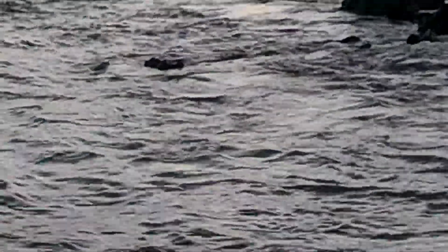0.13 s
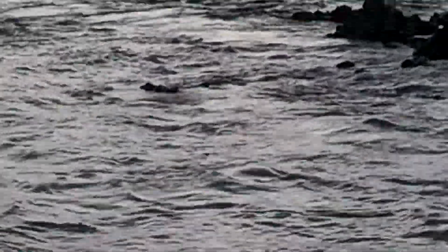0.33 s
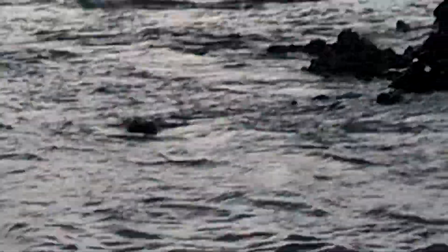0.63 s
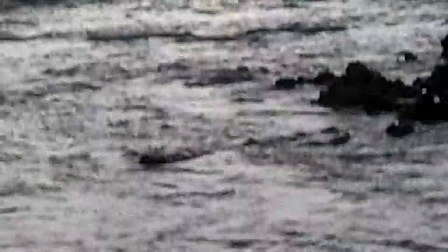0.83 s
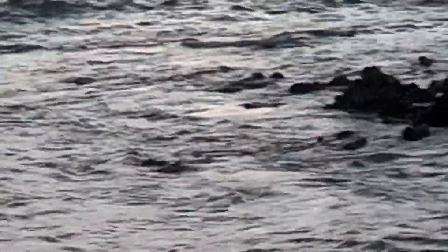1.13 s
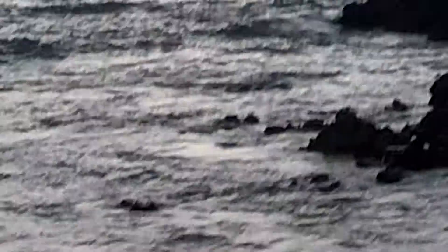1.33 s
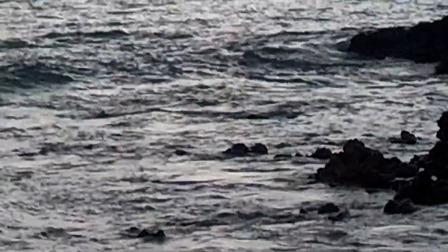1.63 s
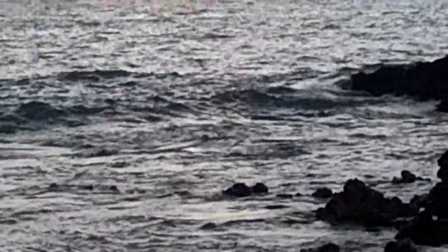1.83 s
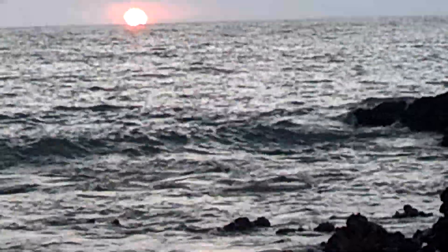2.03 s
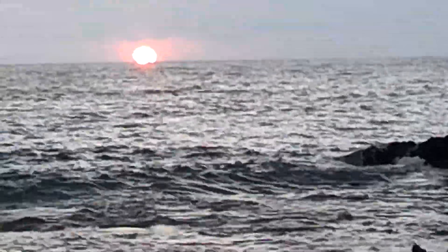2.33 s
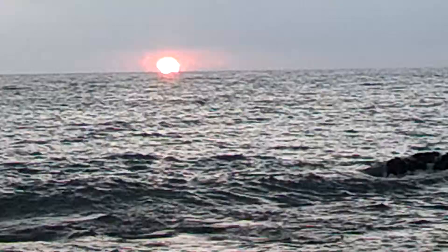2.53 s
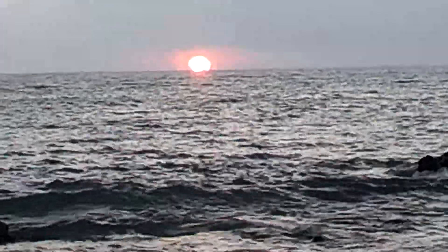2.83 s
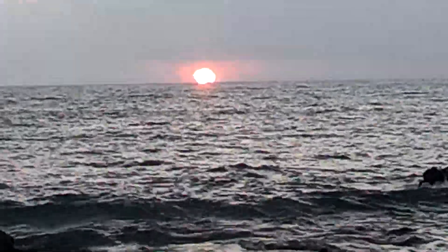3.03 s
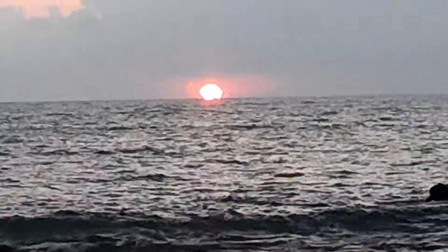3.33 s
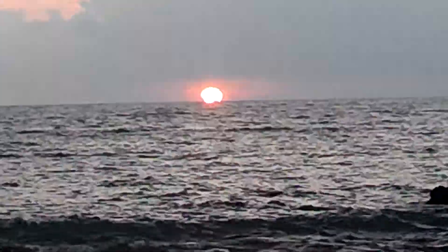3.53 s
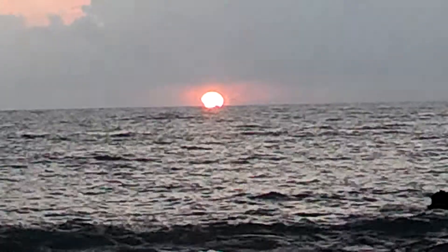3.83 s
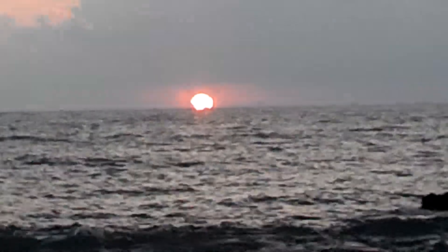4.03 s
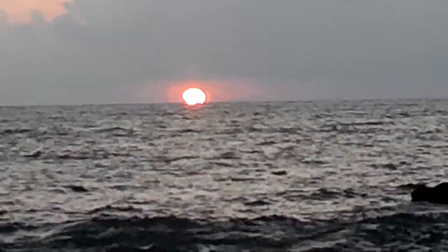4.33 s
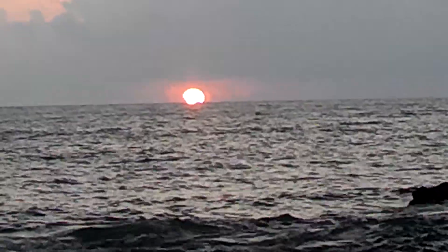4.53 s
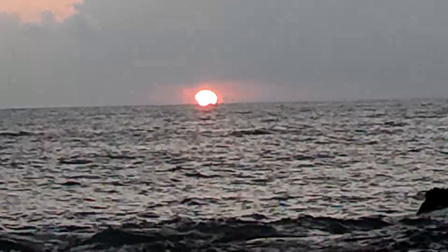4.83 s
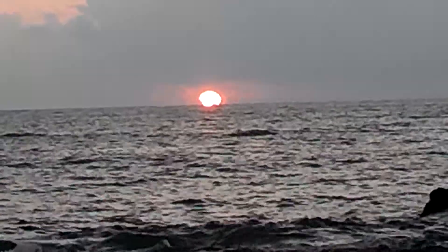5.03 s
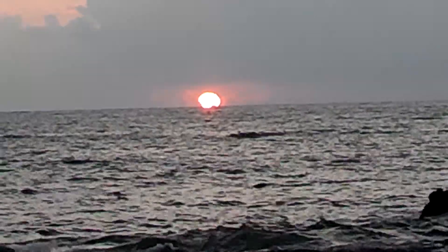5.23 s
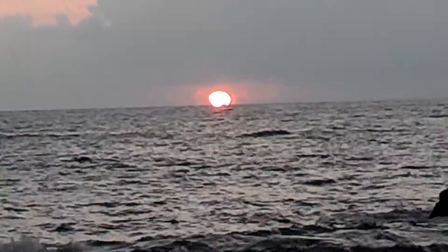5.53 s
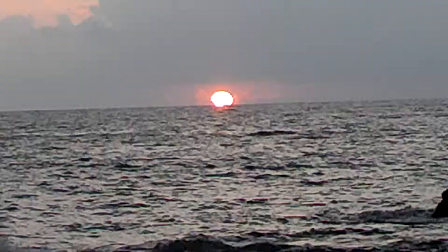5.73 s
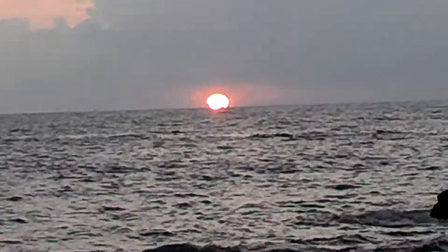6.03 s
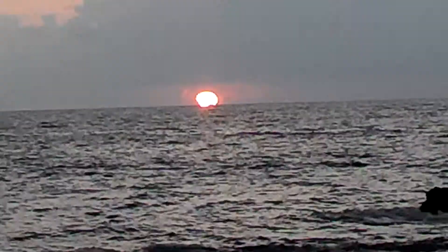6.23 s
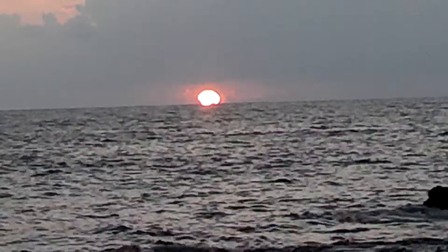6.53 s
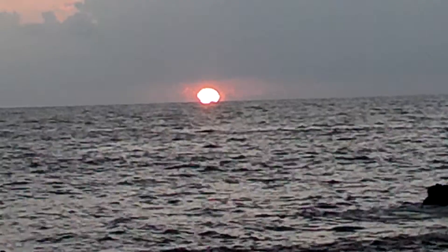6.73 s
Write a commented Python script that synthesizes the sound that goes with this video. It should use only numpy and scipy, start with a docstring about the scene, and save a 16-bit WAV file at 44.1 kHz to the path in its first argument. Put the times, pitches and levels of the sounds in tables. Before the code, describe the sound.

Close ocean wash hisses and churns among rocks over a soft low roar, with bubbling plops, ticking drops and a growing final surge.

```python
"""Surf washes over a rocky shore: noise and showers of damped sines make roar, churn, wash and fizzing spray.
It starts strong and eases over the first second, while puffs of breeze rumble as band-passed noise around 150 Hz.
Air pockets gulp as swelling, rising sines and drops snap on rock as short cracks with noise spatter throughout.
Near 2.9 s one sharp snap makes the camera's limiter duck, and the sea swells back over most of a second.
A loud, mid-pitched gulp of air stands out near 4.8 s, and the surf grows again; two ports hear it over faint hiss."""
import sys
import numpy as np
from scipy import signal
from scipy.fft import rfft, irfft, next_fast_len
from scipy.io import wavfile
from scipy.ndimage import uniform_filter1d, minimum_filter1d, map_coordinates

SR = 44100
rng = np.random.default_rng(int(sys.argv[2]) if len(sys.argv) > 2 else 0)


def file_out(sig):
    """Save sig as 16-bit WAV at sys.argv[1]."""
    # one column per channel
    cols = np.atleast_2d(sig).T
    # limit, then scale
    lim = np.clip(cols, -1, 1)
    pcm = np.round(lim * 32767).astype(np.int16)
    wavfile.write(sys.argv[1], SR, pcm)


N = 303849
TIME = np.arange(N) / SR  # s

# Levels of sources are those ahead of the ports and the limiter; colours are relative spectra.
# steady microphone hiss: frequency_hz, density_db (per Hz)
HISS_COLOUR = [(6000, -20), (10000, -5), (13000, -3), (15500, 0)]
# puffs of breeze on the ports: peak_s, level_db, half_length_s (power falls to 1/e)
BREEZE_PUFFS = [(.07, -53, 0.049), (0.604, -53.5, .04), (0.88, -47, 0.041), (1.11, -50, .04),
                (1.27, -53, .06), (1.44, -52, .045), (1.64, -53.5, .06), (1.846, -54, 0.052),
                (2.04, -47, 0.031), (3.662, -53, .06), (5.37, -49, 0.053)]
# colour of their rumble: frequency_hz, density_db (per Hz)
BREEZE_COLOUR = [(25, -22), (55, -22), (85, -3.5), (125, 10), (170, 12), (300, -64)]
# drops that hit the rocks, ahead of their filters: start_s, crack_peak_db, spatter_db (rms at its crest)
DROP_SNAPS = [(.184, -12, -35), (.575, -12, -31), (.618, -23, -28), (1.102, -17, -34), (1.923, -14, -35),
              (1.936, -11, -36), (2.352, -23, -26), (2.359, -28, -32), (2.858, .7, -18), (3.024, -19, -33),
              (3.378, -17, -36), (3.682, -20, -33), (4.573, -16, -35), (6.636, -14, -35)]
SPATTER_S = 0.00094  # swell time of the droplets
# pockets of air that gulp between the rocks: start_s, pitch_hz (at the crest), peak_db
AIR_GULPS = [(0.095, 1390, -25), (.126, 366, -24), (.147, 3208, -25), (.541, 441, -27), (.575, 890, -26),
             (.6325, 9657, -33), (1.058, 11035, -38), (1.085, 192, -39), (1.117, 1040, -27),
             (1.358, 1044, -30), (1.736, 3176, -28.5), (1.762, 218, -35), (1.768, 3100, -26.5),
             (1.809, 3090, -28), (1.852, 3477, -23), (1.882, 2917, -31), (2.051, 616, -26),
             (2.076, 1959, -24.5), (2.0875, 10917, -36), (2.343, 4000, -25), (2.351, 2939, -27),
             (2.358, 9959, -30), (2.360, 1170, -22.5), (2.854, 4155, -23), (3.385, 177, -30),
             (3.425, 1851, -22), (3.602, 664, -25.5), (3.844, 340, -31), (3.937, 1250, -23),
             (4.035, 188, -33.5), (4.242, 441, -26), (4.306, 1280, -22), (4.463, 430, -29),
             (4.6215, 8085, -35), (4.6386, 13824, -35), (4.763, 1173, -24), (4.834, 965, -13.5),
             (4.843, 850, -24), (5.006, 250, -26), (5.011, 380, -23), (5.288, 2906, -27),
             (5.315, 1160, -21), (5.390, 3294, -24.5), (5.715, 398, -27), (5.929, 215, -26.5),
             (5.937, 322, -23.5), (6.528, 364, -33)]
# swell time at the given pitch; lower pockets are slower by the given power
GULP_SWELL_S, GULP_PITCH_HZ, GULP_SLOWS = 0.0029, 990, 0.82
# strength of the surf, ahead of ripple and laps: time_s, wash_level_db
SURF_STRENGTH = [(0, -29.5), (.3, -30.5), (.42, -31.5), (.56, -31), (.7, -34.5), (.95, -36.5),
                 (1.15, -34.5), (1.62, -36.5), (2.2, -35.5), (2.46, -36.5), (2.7, -34), (3.1, -32.6),
                 (3.75, -34), (4.9, -31.5), (5.25, -30.5), (5.6, -29.5), (6.0, -31.5), (6.3, -29),
                 (6.89, -30.5)]
# nearness of the breakers, ahead of heave and laps: time_s, roar_level_db
BREAKER_NEARNESS = [(0, -35.5), (.55, -39.5), (.75, -42), (1.28, -38.5), (1.6, -43), (2.2, -39),
                    (2.48, -43), (2.82, -38.5), (2.95, -36.5), (3.6, -38.5), (4.3, -38), (4.9, -35.5),
                    (5.58, -33.5), (5.85, -35), (6.2, -33), (6.45, -32), (6.65, -31.5), (6.89, -33.5)]
# wavelets that lap over the rocks: crest_s, roar_db, churn_db, wash_db, rise_s (from 1/e of the power)
LAP_WAVES = [(.16, -37, -34, -36, .039), (1.77, -45, -34, -37, 0.043), (1.92, -43.5, -39.5, -39, 0.12),
             (2.14, -44, -35, -44, 0.071), (2.27, -42, -37, -42, 0.052), (2.352, -43, -32, -33.5, 0.033),
             (2.58, -41, -51, -53, 0.044), (3.15, -48, -47, -40, 0.046), (3.28, -44, -37, -45, 0.067),
             (3.5, -38, -35, -40, 0.058), (3.7, -48, -52, -38, .04), (3.95, -57, -35.5, -36.5, 0.19),
             (4.27, -39, -37, -39, 0.16), (5.21, -34, -41, -43, 0.03), (5.51, -36, -45, -46, 0.03),
             (5.715, -31, -38, -32.5, 0.029), (6.44, -43, -32, -31, 0.037), (6.85, -33.5, -35, -40, .05)]
LAP_FALL = 0.55  # fall time over rise time
# spray against the wash: time_s, level_db
SPRAY_LEVEL_DB = [(0, -12.6), (2.3, -12.4), (2.6, -13.8), (5.2, -14.2), (5.6, -12.2), (6.89, -12.4)]
# foam level at the usual strength (dB), its growth (dB per dB of strength), that strength (dB)
CHURN_DB, CHURN_GROWS, USUAL_DB = -33, 0.85, -30
# colours of the four layers of the surf: frequency_hz, density_db (per Hz)
ROAR_COLOUR = [(25, -32), (50, -29), (75, -23), (110, -9.5), (160, -6.5), (240, -1.5), (340, 1), (440, 0.5),
               (520, -4), (640, -8), (1200, -74)]
CHURN_COLOUR = [(250, -81), (490, -6), (590, -6.5), (750, -1.54), (950, -0.5), (1200, -1.5), (1420, -3.5),
                (1650, -19), (2800, -58)]
WASH_COLOUR = [(700, -70), (1400, -16), (1600, -4), (1850, -2), (2150, -1.3), (2550, -5.1), (3200, -2.0),
               (4200, 0.3), (5400, -1.1), (6100, -5.1), (6800, -9.7), (7400, -15.5), (8200, -28),
               (13000, -80)]
SPRAY_COLOUR = [(3000, -60), (6300, -12), (7600, -3), (8500, -3.5), (10300, -1.5), (12500, -5), (15500, -4)]
# turn from mid towards side, besides that of the port lag: frequency_hz, angle_rad
PORT_WIDTH = [(40, 1.25), (105, .95), (180, .42), (280, .36), (450, .73), (550, 1.02), (650, .67),
              (800, .31), (1000, .23), (1378, 0), (1600, .18), (2200, 0), (2540, -.21), (2756, 0),
              (2950, .11), (3500, 0)]
# likeness of side to mid a quarter cycle apart, positive where left leads: frequency_hz, likeness (-1 to 1)
PORT_LEAD = [(120, -.2), (250, .65), (460, .8), (640, -.8), (850, -.55), (1250, -.1), (1700, .5), (2100, 0),
             (3100, .55), (3600, .8), (5200, .9), (7500, .8), (12000, .7)]
# left minus right: frequency_hz, difference_db
PORT_TILT = [(150, -1), (300, 1.5), (500, 4), (700, 1.8), (1000, 1.4), (1400, 0), (2100, -1.3), (2700, 0)]
PORT_LAG_S = 16 / SR
TOP_HZ = 15830  # band limit of the camera


def amp(db):
    """Logarithmic level: decibels become a linear gain."""
    return 10 ** (np.asarray(db) / 20)


def unit(x):
    """Normalization: the signal is scaled to rms 1."""
    return x / np.sqrt(np.mean(x ** 2) + 1e-20)


def along(points, hz):
    """Interpolation: (frequency, value) points are read on a logarithmic frequency axis."""
    f, v = np.transpose(points)
    return np.interp(np.log(hz + 1), np.log(f + 1), v)


def over_time(points):
    """Interpolation: (time, value) points become a curve of straight segments."""
    return np.interp(TIME, *np.transpose(points))


def wobble(rate):
    """Slow random modulation: a smooth curve through random knots, `rate` of them a second."""
    knots = rng.standard_normal(int(N * rate / SR) + 4)
    return map_coordinates(knots, [TIME * rate])


def filtered(x, response):
    """Linear filtering: the spectrum is multiplied by a response of frequency."""
    m = next_fast_len(N + 8192)
    spectrum = rfft(x, m) * response(np.fft.rfftfreq(m, 1 / SR))
    return irfft(spectrum, m)[..., :N]


def coloured(x, colour):
    """Spectral shaping: the signal takes on a colour and is scaled to rms 1."""
    return unit(filtered(x, lambda hz: amp(along(colour, hz))))


def hiss(level_db=-53):
    """Self-noise: the microphone adds a faint, bright, steady random signal."""
    return amp(level_db) * coloured(rng.standard_normal((2, N)), HISS_COLOUR)


def breeze():
    """Turbulent pressure: each puff of air rumbles briefly, independently at each port."""
    power = sum(amp(db) ** 2 * np.exp(-((TIME - s) / half) ** 2) for s, db, half in BREEZE_PUFFS)
    return np.sqrt(power) * coloured(rng.standard_normal((2, N)), BREEZE_COLOUR)


def snaps(pitch_hz=4600, life_s=.00007, dull_hz=7500):
    """Impact radiation: a drop hits stone with one sharp cycle, then a short spatter of droplets."""
    cracks, spatters = np.zeros((2, N + SR))
    t = np.arange(SR // 20) / SR
    crack = np.sin(2 * np.pi * pitch_hz * t) * t * np.exp(-t / life_s)
    crack /= np.abs(crack).max()
    swell = t / SPATTER_S * np.exp(1 - t / SPATTER_S)
    for s, crack_db, spatter_db in DROP_SNAPS:
        start = round(s * SR)
        cracks[start:][:len(t)] += amp(crack_db) * crack
        spatters[start:][:len(t)] += amp(spatter_db) * rng.standard_normal(len(t)) * swell
    spatter = filtered(spatters[:N], lambda hz: 1 / (1 + (hz / dull_hz) ** 2))
    # so small a drop radiates little bass
    return filtered(cracks[:N] + spatter, lambda hz: hz ** 4 / (hz ** 4 + 2400 ** 4))


def gulps(glide=0.051):
    """Bubble resonance: trapped air swells and dies quickly, rising a little in pitch as it surfaces."""
    out, t = np.zeros(N + SR), np.arange(SR // 10) / SR
    for s, hz, db in AIR_GULPS:
        u = t / (GULP_SWELL_S * (GULP_PITCH_HZ / hz) ** GULP_SLOWS)  # time in swell times
        cycles = np.cumsum(hz * (1 + glide * (u - 1))) / SR
        envelope = (u * np.exp(1 - u)) ** 3
        out[round(s * SR):][:len(t)] += amp(db) * envelope * np.sin(2 * np.pi * cycles)
    return out[:N]


def rush(patchy_db):
    """Random superposition: countless far bubbles are two unrelated noises with drifting patches of gain."""
    spectra = signal.stft(rng.standard_normal((2, N)), nperseg=512)[2]
    field = rng.standard_normal(spectra.shape[1:])
    field = uniform_filter1d(field, size=5, axis=0)  # along frequency
    field = uniform_filter1d(field, size=10, axis=1)  # along time
    return unit(signal.istft(spectra * amp(patchy_db * unit(field)), nperseg=512)[1][:, :N])


def bubbles(count, pitch_hz, spread, cycles, scatter_db, size):
    """Damped resonance: near bubbles ring and rise a little in pitch, in two unrelated showers."""
    chance = rng.random((count, 3))  # for strength, start and channel
    hz = np.clip(pitch_hz * np.exp(spread * rng.standard_normal((count, 1))), 60, TOP_HZ)
    strength = amp(-scatter_db * np.log(np.clip(chance[:, :1], .01, 1)))
    age = hz * np.arange(size) / SR / cycles  # in lifetimes
    envelope = strength * np.exp(-age) * (1 - np.exp(-6 * age))
    rings = envelope * np.sin(2 * np.pi * cycles * age * (1 + 0.025 * np.minimum(age, 4)))
    # both channels lie end to end while the rings are summed
    start = (chance[:, 1:2] * N).astype(int) + N * (chance[:, 2:] < .5)
    shower = np.bincount((start + np.arange(size)).ravel(), rings.ravel(), 2 * N + size)
    return unit(shower[:2 * N].reshape(2, N))


def water(colour, level_db, far, near):
    """Superposition: far and near bubbles share one colour and follow a level in time."""
    return amp(level_db) * coloured(far + near, colour)


def laps():
    """Addition of power: wavelets swell to a crest and drain away in roar, churn and wash."""
    power = np.zeros((3, N))
    for s, roar_db, churn_db, wash_db, rise in LAP_WAVES:
        u = (TIME - s) / rise
        shape = np.exp(-np.where(u < 0, u, u / LAP_FALL) ** 2)
        power += amp([[roar_db], [churn_db], [wash_db]]) ** 2 * shape
    return power


def levels(ripple_db=0.15, heave_db=0.03):
    """Energy balance in dB: roar follows the breakers, churn and wash the surf; laps add to all three."""
    strength_db = over_time(SURF_STRENGTH) + ripple_db * wobble(16)
    roar_db = over_time(BREAKER_NEARNESS) + heave_db * wobble(14)
    churn_db = CHURN_DB + CHURN_GROWS * (strength_db - USUAL_DB)
    return 10 * np.log10(amp([roar_db, churn_db, strength_db]) ** 2 + laps())


def deepened(roar, level_db, corner_hz=220, growth=0.14):
    """Size and pitch: stronger breakers trap bigger air clouds, so the bass swells more than the rest."""
    bass = filtered(roar, lambda hz: 1 / (1 + (hz / corner_hz) ** 6))
    bass_gain = amp(growth * (level_db - np.percentile(level_db, 65)))
    return roar + bass * (bass_gain - 1)


def surf():
    """Bubble acoustics: big air clouds roar, smaller bubbles churn and wash, fine spray fizzes."""
    roar_db, churn_db, wash_db = levels()
    slosh = wobble(36)  # quick splashes lift the upper layers together
    spray_db = wash_db + over_time(SPRAY_LEVEL_DB) + .35 * slosh + .3 * wobble(90)
    roar = water(
        ROAR_COLOUR, roar_db, rush(patchy_db=0.0),
        amp(-25) * bubbles(count=1400, pitch_hz=291.2, spread=0.406, cycles=4.0, scatter_db=2, size=1800))
    churn = water(
        CHURN_COLOUR, churn_db + 0.2 * slosh, rush(patchy_db=1.05),
        amp(-21.5) * bubbles(count=3600, pitch_hz=997, spread=0.355, cycles=4.3, scatter_db=2.0, size=900))
    wash = water(
        WASH_COLOUR, wash_db + .55 * slosh, rush(patchy_db=1.4),
        amp(-15.5) * bubbles(count=7000, pitch_hz=3526, spread=0.445, cycles=4.1, scatter_db=3.0, size=500))
    spray = water(
        SPRAY_COLOUR, spray_db, rush(patchy_db=1.3),
        amp(-13) * bubbles(count=9000, pitch_hz=9500, spread=.3, cycles=2.5, scatter_db=3.8, size=80))
    return deepened(roar, roar_db) + churn + wash + spray


def ports(direct, diffuse):
    """Interference: the lag between two ports turns the treble round and round between mid and side."""
    def angle(hz):
        return along(PORT_WIDTH, hz) + np.pi * np.maximum(hz * PORT_LAG_S - .5, 0)

    def lead(hz):
        return np.clip(along(PORT_LEAD, hz), -1, 1)

    mid = filtered(direct, lambda hz: np.cos(angle(hz)))
    # 1j puts the related part of the side a quarter cycle from the mid
    side = filtered(direct, lambda hz: 1j * lead(hz) * np.sin(angle(hz)))
    side += filtered(diffuse, lambda hz: np.sqrt(1 - lead(hz) ** 2) * np.sin(angle(hz)))
    left_right = np.array([mid + side, mid - side])
    return filtered(left_right, lambda hz: amp(np.outer([.5, -.5], along(PORT_TILT, hz))))


def limiter(x, ceiling_db, hold_s, release_db_per_s, size=65):
    """Gain control: a peak over the ceiling pulls the gain down just ahead; it holds, then creeps back."""
    peak_db = 20 * np.log10(np.abs(x).max(axis=0) + 1e-9)
    excess = np.maximum(peak_db - ceiling_db, 0)
    span = 2 * int(hold_s * SR / 2) + 1
    held = -minimum_filter1d(-excess, span, origin=span // 2)
    release = release_db_per_s * TIME
    cut = np.maximum.accumulate(held + release) - release
    # look ahead by `size` samples and smooth the step
    return x * amp(uniform_filter1d(minimum_filter1d(-cut, size), size))


def scene():
    """Superposition: sea, hiss and single splashes pass the two ports, and the breeze is added."""
    direct, diffuse = surf() + hiss()
    return ports(direct + gulps() + snaps(), diffuse) + breeze()


def record(dry):
    """Band limitation: the camera limits peaks and keeps nothing above its top frequency."""
    limited = limiter(dry, ceiling_db=-11.0, hold_s=0.06, release_db_per_s=12.5)
    return filtered(limited, lambda hz: hz < TOP_HZ)


dry = scene()
out = record(dry)
file_out(out)
```